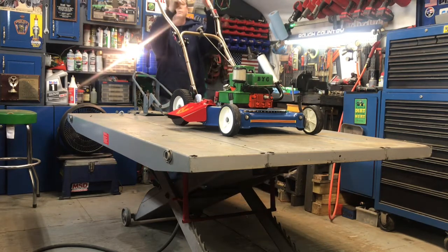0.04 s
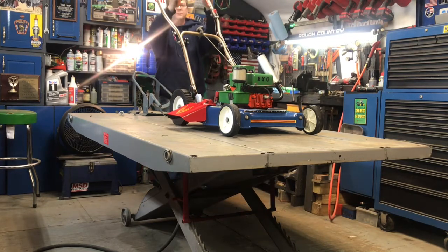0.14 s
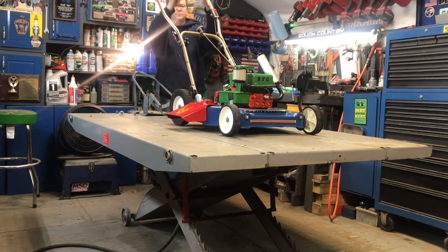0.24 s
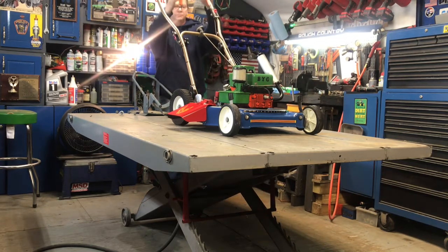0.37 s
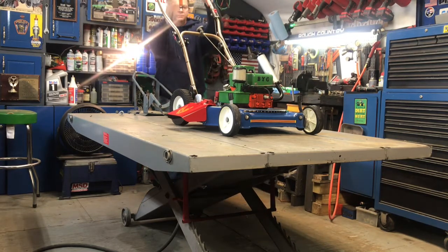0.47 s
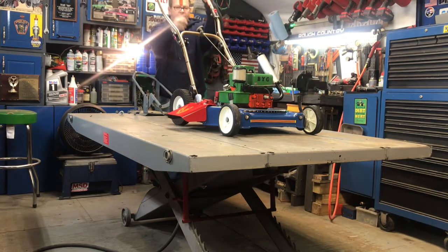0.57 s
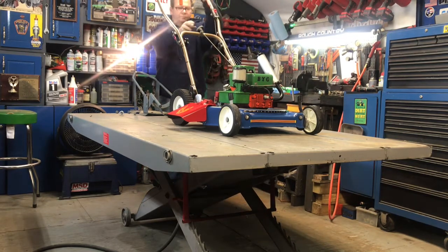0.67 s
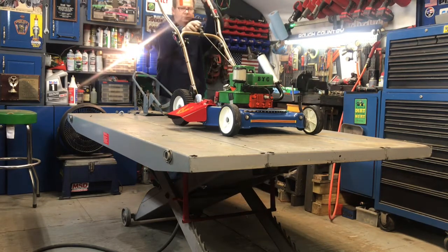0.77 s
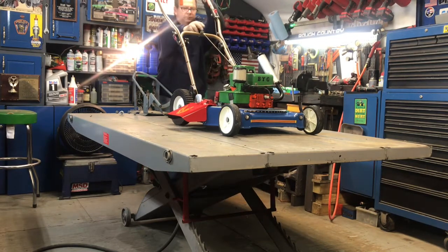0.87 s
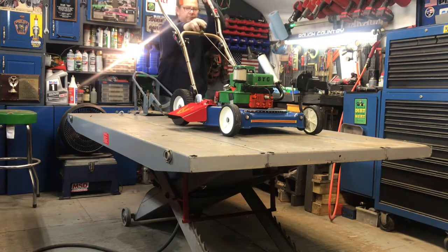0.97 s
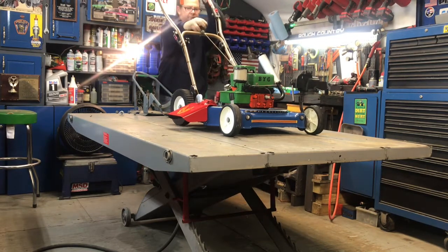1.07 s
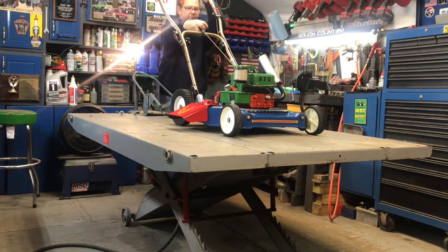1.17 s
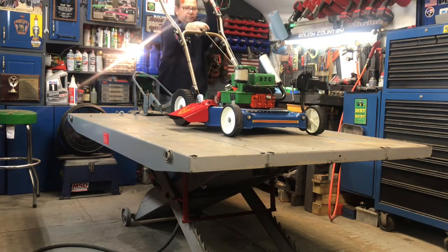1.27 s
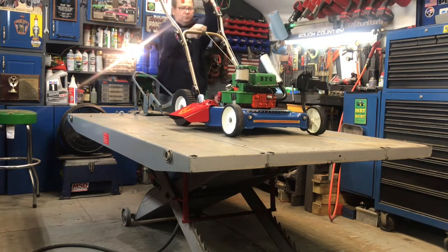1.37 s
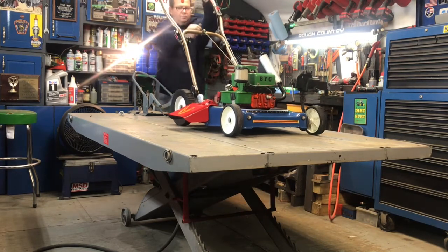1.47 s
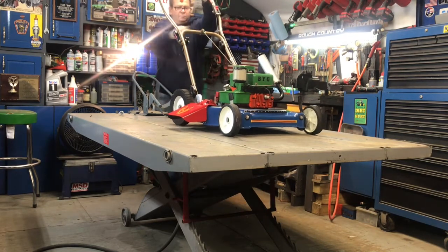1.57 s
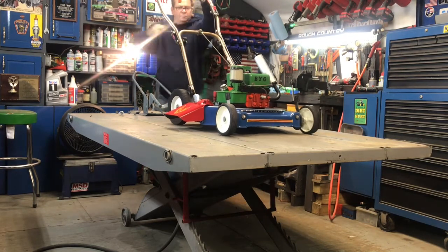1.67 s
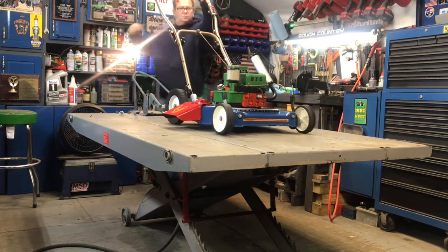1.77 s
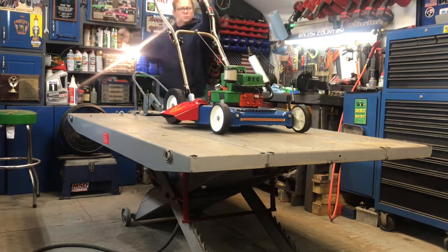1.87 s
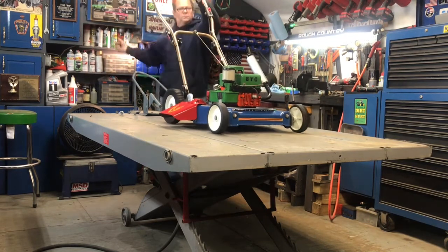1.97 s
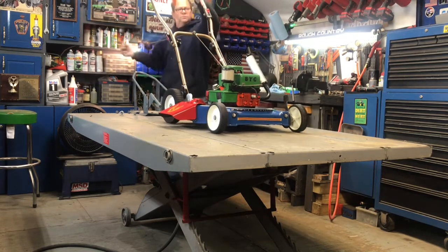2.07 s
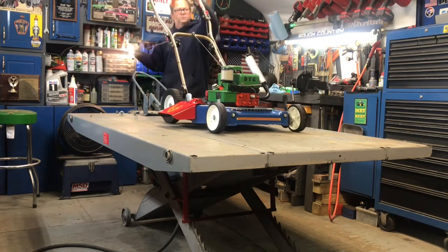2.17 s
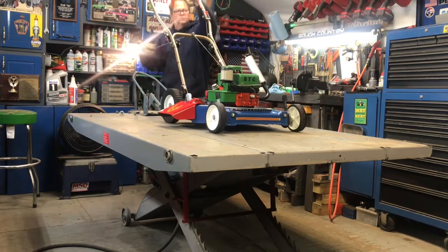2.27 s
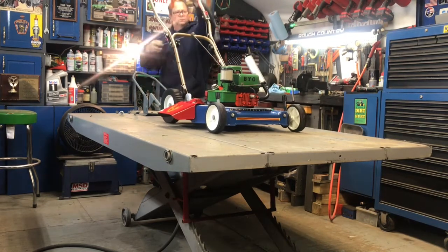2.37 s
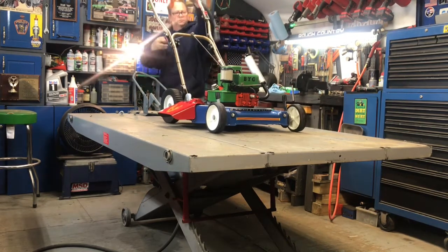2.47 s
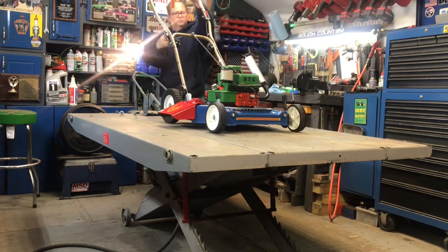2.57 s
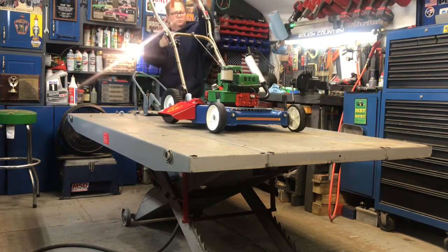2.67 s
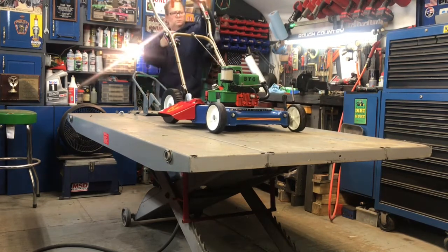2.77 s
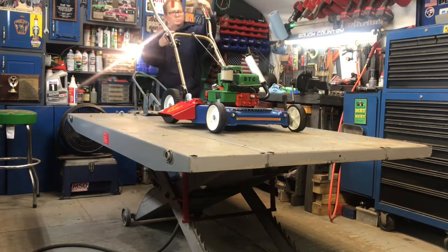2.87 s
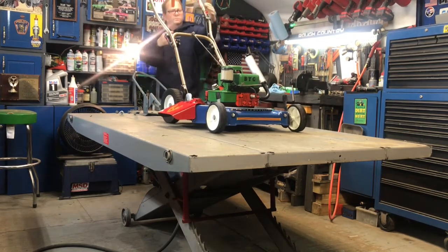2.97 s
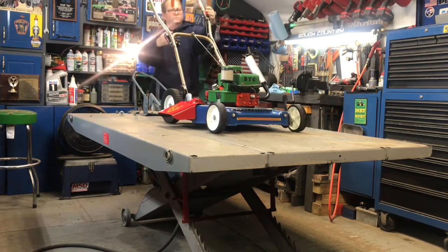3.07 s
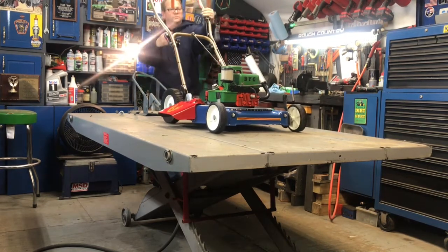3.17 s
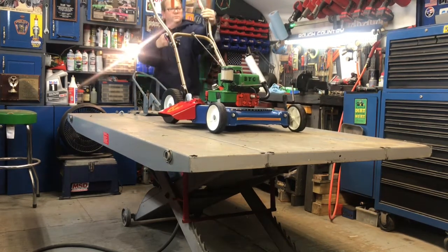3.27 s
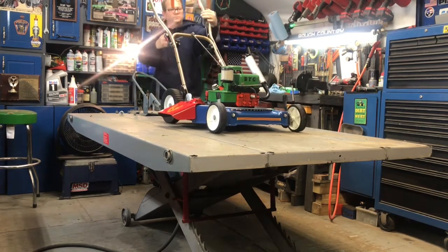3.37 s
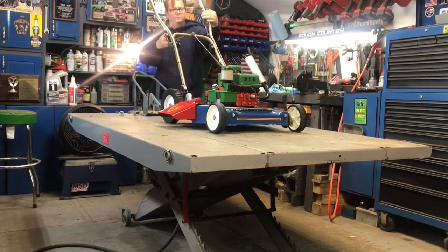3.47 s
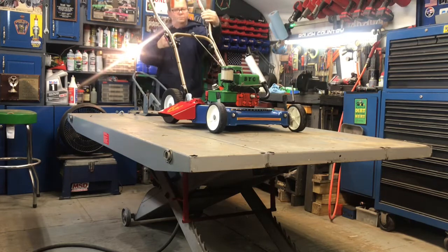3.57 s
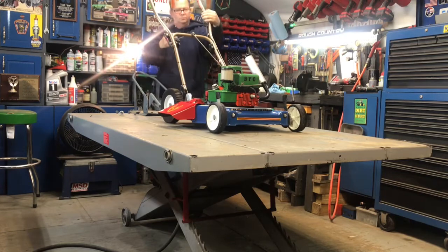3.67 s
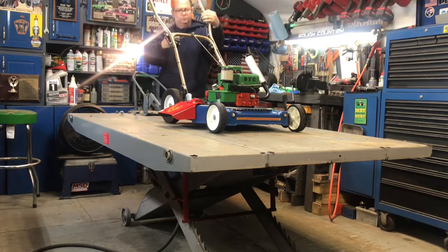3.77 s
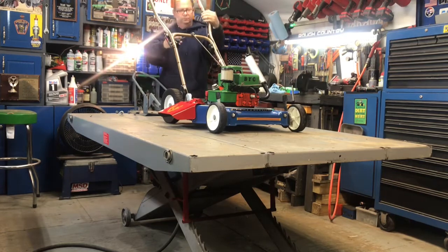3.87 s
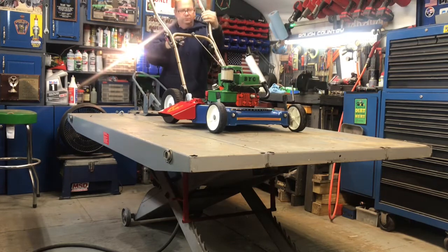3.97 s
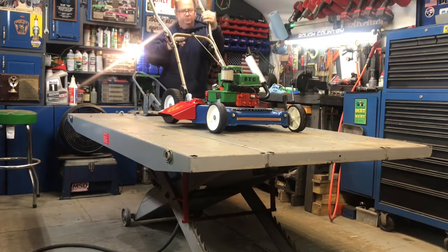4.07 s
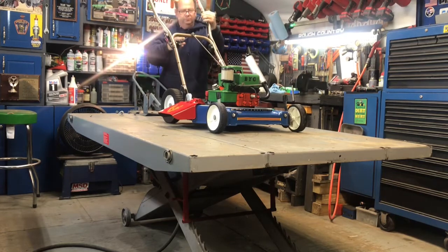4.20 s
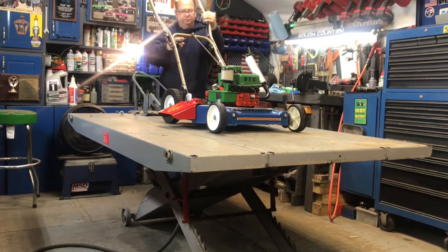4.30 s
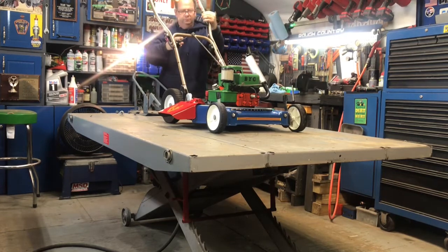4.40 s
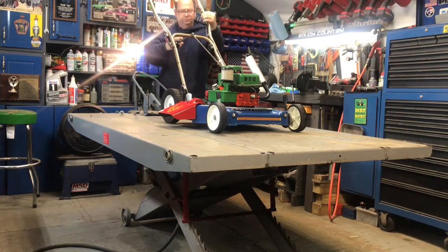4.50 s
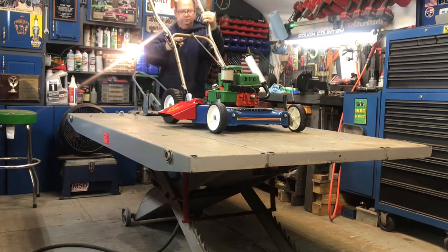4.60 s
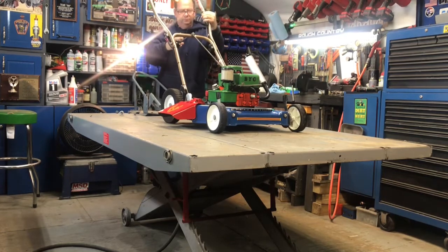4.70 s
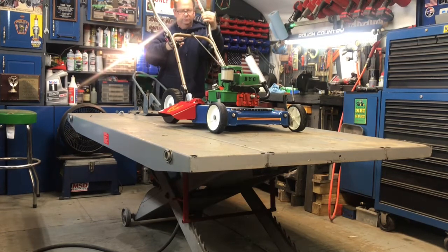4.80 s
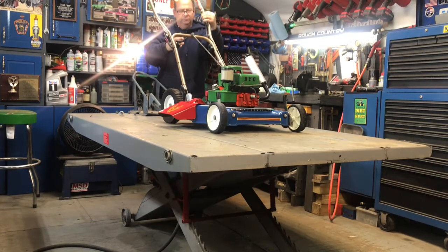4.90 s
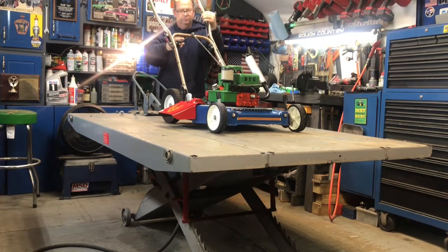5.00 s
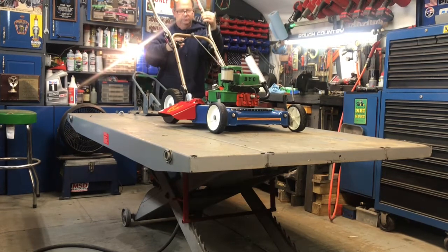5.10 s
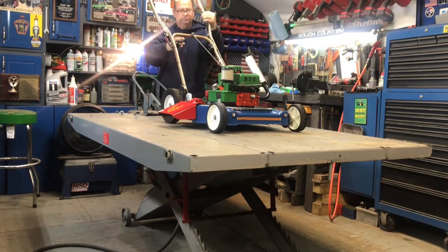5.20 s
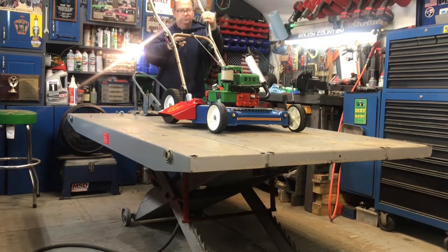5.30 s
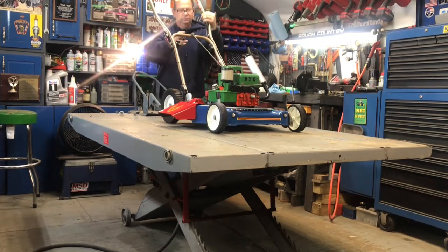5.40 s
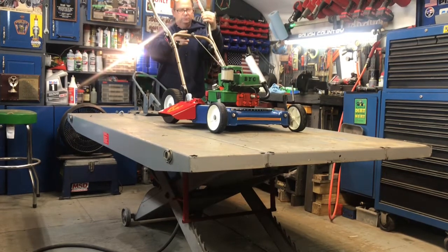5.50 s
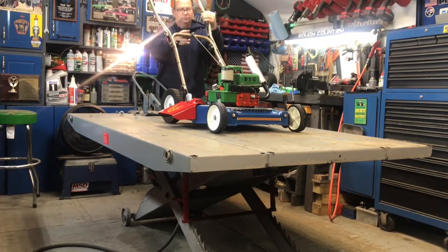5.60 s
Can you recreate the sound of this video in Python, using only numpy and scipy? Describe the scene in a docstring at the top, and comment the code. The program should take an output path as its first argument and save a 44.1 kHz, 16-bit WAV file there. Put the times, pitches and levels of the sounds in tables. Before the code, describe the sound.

Light handle clicks over a low blower rumble, then a rope-pulled lawn mower engine catches, idles in uneven chugs and revs up in a garage.

```python
"""A single-cylinder four-stroke mower is rope-started, catches, idles at six firings a second, then picks up.
Each cycle is a round of blows (exhaust, valve clack, compression knock): impulses and noise bursts placed by
crank phase, that ring the engine, deck and bench through filters. Before the pull the handle clicks, from
struck-tube contacts. Behind it all a furnace blower rumbles: shaped noise and a motor hum."""
import sys
import numpy as np
from scipy import signal
from scipy.fft import rfft, irfft
from scipy.io import wavfile
from scipy.ndimage import uniform_filter1d

SR = 44100
rng = np.random.default_rng(int(sys.argv[2]) if len(sys.argv) > 2 else 0)


def wav_out(sig):
    """Save sig, one row per channel (or a flat mono array), as 16-bit PCM at SR to the path in sys.argv[1]."""
    wavfile.write(sys.argv[1], SR, np.round(np.clip(np.atleast_2d(sig).T, -1, 1) * 32767).astype(np.int16))


N = 249165
TIME = np.arange(N) / SR

# engine speed, one cycle being two crank turns: (time [s], speed [cycles/s])
SPEED = [(1.4, 3.335), (1.63, 5.24), (1.95, 7.371), (2.74, 6.638), (2.8, 6.381), (3.49, 6.064),
         (4.36, 6.724), (4.85, 9.73), (5.6, 12.254)]
# throttle: (time [s], opening [0-1])
THROTTLE = [(1.8, 0.37), (1.95, 0.38), (2.37, 0.3), (2.55, 0.1), (3.4, 0.21), (4.39, 0.16), (4.52, 0.66),
            (5.3, 0.9)]
CRANK_S = 1.396  # first opening of the exhaust valve, as the rope turns the crank
IDLE_CYCLES_PER_S = 6.14

# strength of each part, before any offset its function adds: (base level [dB], rise at full throttle [dB],
# slope up to idle speed [dB/doubling], knee [cycles/s], slope above knee [dB/doubling])
THUMP_LAW = (-33, 4, 17, 15, 0)
BOOM_LAW = (-39, -4, 16, 4, -2.5)
SPIT_LAW = (-34.5, 12.5, -4.5, 10.5, -13)
CLACK_LAW = (-22.5, 0.8, 17, 8, -4.5)
KNOCK_LAW = (-26.5, -6, 9, 4.5, -1.5)
HUM_LAW = (-37, 2.5, 43, 8, -12)
CLATTER_LAW = (-31, -3, 16, 7.5, 6)

# cycles that fire harder or weaker than the throttle asks, or only pump air:
# (time [s], thump offset [dB], spit offset [dB])
ODD_CYCLES = [(1.396, 3, -14.5), (1.63, 3, -6.5), (1.802, 1, -0.5), (1.948, 4, -0.5), (2.084, 0.5, -0.5),
              (2.222, -3, -22), (2.809, 2, 2), (3.451, 0.5, 0.5), (3.934, 1.5, 1), (4.088, 0.5, 3.5),
              (4.241, -0.5, 3.5), (4.39, 0, 1.5), (5.159, -0.5, 0.5), (5.511, 0, 1)]
# hard firings, as the engine catches and as it picks up: (time [s], bark level [dB], ring level [dB])
HARD_FIRINGS = [(1.803, -22.5, -38), (4.503, -25, -35.5), (4.627, -27, -31), (4.653, -23.5, -26.5),
                (4.757, -25, -40), (4.86, -26.5, -38), (4.952, -23, -34), (5.052, -23, -29),
                (5.146, -22, -34), (5.238, -20, -25), (5.328, -18, -23), (5.414, -18, -23.5),
                (5.5, -19, -25), (5.588, -21, -32)]
# idle exhaust strokes that whistle: (time [s], length [s], starting pitch [Hz], level [dB])
WHISTLES = [(2.802, 0.12, 1730, -35), (2.943, 0.14, 1745, -32), (3.115, 0.17, 1700, -35),
            (3.259, 0.18, 1675, -35.5), (3.588, 0.11, 1740, -35), (3.736, 0.15, 1720, -36.5),
            (3.905, .12, 1730, -35.5)]
# how hard the mower rocks on the bench, before the push offset: (time [s], level [dB])
ROCKING = [(1.6, -45), (1.9, -36), (2.04, -34.5), (2.18, -36), (2.33, -36.5), (2.47, -36.5), (2.8, -41),
           (3.5, -54), (4.25, -38), (5, -58)]
# rattle over one cycle, loud where the crank is jerked, lulled while it coasts: (share of cycle, level [dB])
RATTLE = [(.05, -2.5), (.24, -0.5), (.34, 1), (.54, -.5), (.67, 0), (.79, -0.5), (.94, -4)]
# jolts on the bench under the pull of the rope: (time [s], level [dB])
JOLTS = [(1.455, -27), (1.571, -27.5), (1.687, -30)]
# handle and bail contacts, levels before offsets: (time [s], thunk [dB], knock [dB], snap [dB], tick [dB],
# favoured resonance [Hz], its ring level [dB])
CONTACTS = [(0.056, -57, -53, -44, -60, 1772, -45), (.062, -34, -46, -55, -70, 306, -38.5),
            (.12, -61, -67, -45.5, -64, 4160, -54), (0.129, -51, -59, -61, -63, 2700, -58),
            (.261, -52, -52.5, -80, -92, 985, -58), (0.304, -53, -59, -77, -75, 829, -59),
            (0.976, -60, -53, -66, -72, 471, -45), (0.991, -54, -44.5, -58, -70, 985, -51),
            (1.1, -62, -64, -70, -52, 1235, -66), (1.14, -60, -56, -80, -75, 985, -57),
            (1.204, -50, -47.5, -74, -75, 910, -40.5)]

# resonances of engine and deck, handle, cylinder head, bench:
# (frequency [Hz], width [Hz], level over the broad response [dB])
DECK_MODES = [(306, 39, -3.5), (550.5, 11, 5.5), (758, 32, 1), (913, 24, 3.5), (983, 20, 5.5),
              (1162, 22, 1), (1309, 11.6, 5), (1330, 12, -18), (1516, 33, 2.5), (1685, 23, -5),
              (1762, 25, 0.5), (2237, 40, -1), (2597, 25, 5.5), (2648, 25, 3.5), (2800, 19, -1),
              (3340, 9.8, -9), (3502, 17, 7.5)]
HANDLE_MODES = [(310, 60, 5), (466, 18, 9), (553, 14, 0), (830, 18, 4), (913, 13, -2), (985, 11, -1),
                (1243, 23, 10), (1640, 20, 1), (1790, 50, -1), (2060, 42, 0), (2740, 50, -2), (3480, 55, 1),
                (3830, 76, 1), (4160, 60, 5)]
HEAD_MODES = [(1602, 120, 7.5), (1764, 70, -2.5), (2084, 120, -5), (2405, 99, 8)]
BENCH_MODES = [(75, 14, -9), (136, 28, -10)]

# broad spectral shape of each sound: (frequency [Hz], relative level [dB])
# exhaust: slug, hollow muffler and crankcase, gas spit, combustion ping
THUMP_SHAPE = [(22, -34), (42, 5), (60, 0.5), (85, 4), (150, -2.5), (210, -14), (310, -25), (420, -19.5),
               (560, -17), (800, -43), (2000, -60)]
BOOM_SHAPE = [(48, -4), (85, -3), (150, 1.5), (215, -13.5), (300, -27), (800, -48)]
SPIT_SHAPE = [(300, 15), (1000, 12.5), (2500, 2), (4500, 11), (6500, 13), (7500, 8), (8700, 15),
              (10300, 6.5), (12000, 11.5), (15500, 9)]
PING_SHAPE = [(450, -4), (750, -11), (1200, -16), (1600, -2.5), (2050, 0.5), (2450, -5), (2900, -13),
              (5000, -17), (10000, -34)]
# mechanics: valve clack, compression knock, rattle, rope
CLACK_SHAPE = [(90, -17), (170, -3), (240, -12), (320, -13), (450, -4.5), (700, -4.5), (1200, 2),
               (1700, 0.5), (2100, 4), (3200, 8.5), (4300, 5.5), (5000, 0), (6200, -0.5), (8000, -8),
               (15000, -23)]
KNOCK_SHAPE = [(80, -9), (160, 4), (240, -8), (320, -1), (420, -4.5), (650, -4), (1000, 0.5), (1600, 1.5),
               (2200, -26), (4000, -4.5), (6000, -6.5), (9000, -12.5), (10500, -15), (15000, -20)]
METAL_SHAPE = [(60, -30), (150, -7), (250, -14), (400, -9), (660, -15), (800, -8.5), (950, -1.5),
               (1600, -1.5), (2100, -5), (4200, -5.5), (4800, -11), (6000, -9.5), (7500, -20), (8700, -15),
               (10200, -22.5), (12000, -17), (15500, -24.5)]
ROPE_SHAPE = [(100, -19), (300, -1.5), (700, -4.5), (1100, -0.5), (2500, 0), (4300, 0.5), (5200, -4),
              (9000, -7), (10500, -11.5), (15000, -13.5)]
# handle contacts, soft to hard
THUNK_SHAPE = [(100, -21), (230, -9), (320, 2.5), (500, -5.5), (900, -5.5), (2000, -41)]
RAP_SHAPE = [(250, -20), (500, -3), (950, 4), (1800, -7), (3000, -10), (8000, -57)]
SNAP_SHAPE = [(700, -38), (1900, 4.5), (2600, -3), (3500, 5), (4500, -1), (5400, -7), (9000, -15),
              (15000, -34)]
TICK_SHAPE = [(2000, -23), (6000, 2), (10000, 4), (15000, 3)]
# furnace: low rumble, air hiss
RUMBLE_SHAPE = [(20, -23), (32, -26), (45, -8), (60, -9), (72, 6), (85, -10.5), (105, -11.5), (130, -21),
                (250, -41)]
AIR_SHAPE = [(65, -54), (110, -11), (154, -5.5), (193, -33), (233, -12.5), (275, -19), (483, -21),
             (780, -26), (848, -21.5), (1210, -30.5), (1520, -28), (1650, -33), (2600, -39), (5200, -41),
             (10500, -35), (12700, -27), (16000, -40)]


def amp(db):
    """Decibels to gain."""
    return 10 ** (np.asarray(db) / 20)


def unit(x):
    """Scale to rms 1."""
    return x / np.sqrt(np.mean(x ** 2))


def noise():
    """White noise, full length."""
    return rng.standard_normal(N)


def wander(size):
    """Slow random curve of rms 1: noise averaged over this many samples."""
    return unit(uniform_filter1d(noise(), size=size))


def convolve(x, response):
    """Pass a sound through an impulse response."""
    return signal.fftconvolve(x, response)[:N]


def colour(points, modes=(), size=16384):
    """Causal impulse response of unit energy: a broad (Hz, dB) shape with resonances standing on it."""
    hz = np.maximum(np.arange(size // 2 + 1) * SR / size, 1)
    at_hz, db = np.transpose(points)
    gain = amp(np.interp(np.log(hz), np.log(at_hz), db))
    gain = gain * np.minimum(hz / at_hz[0], 1) * np.minimum(at_hz[-1] / hz, 1)
    gain = gain * (1 + sum(amp(d) / (1 + (2 * (hz - f) / w) ** 2) for f, w, d in modes))
    # minimum phase: fold the cepstrum onto positive time
    cepstrum = irfft(np.log(gain))
    cepstrum[1:size // 2] *= 2
    cepstrum[size // 2 + 1:] = 0
    response = irfft(np.exp(rfft(cepstrum)))
    return response / np.linalg.norm(response)


def impulses(times, sizes):
    """One impulse of the given size at each time."""
    index = (np.asarray(times) * SR).astype(int)
    return np.bincount(np.maximum(index, 0), sizes, N)[:N]


def blows(times, db, rise_s, fall_s, loose, tail_db, tail_s=0.058, grit=0.51):
    """Rattling bursts with a room tail; one part repeats at every blow, the loose share (0-1) is new each time."""
    t = TIME[:SR // 3]
    shape = (1 - np.exp(-t / rise_s)) * (np.exp(-t / fall_s) + amp(tail_db) * np.exp(-t / tail_s))
    hits = impulses(times, amp(db))
    grain = rng.standard_normal(len(t)) * np.exp(grit * rng.standard_normal(len(t)))
    same = convolve(hits, shape * unit(grain))
    fresh = np.sqrt(np.abs(convolve(hits ** 2, shape ** 2))) * noise()
    return np.sqrt(1 - loose) * same + np.sqrt(loose) * fresh


def speed(times):
    """Engine cycles per second at these times."""
    return np.interp(times, *np.transpose(SPEED))


def cycles_run():
    """Engine cycles completed at every sample, counted from the first opening of the exhaust valve."""
    run = np.cumsum(speed(TIME)) / SR
    return run - np.interp(CRANK_S, TIME, run)


def at_phase(phase):
    """The moment in every cycle when the crank has run this share of its two turns."""
    run = cycles_run()
    return np.interp(np.arange(int(run[-1]) + 1) + phase, run, TIME, right=2 * TIME[-1])


def strength(times, law):
    """Level [dB] of a part: follows the throttle and, with separate slopes up to idle and above a knee, speed."""
    base_db, throttle_db, slow_db, knee, fast_db = law
    slow = np.minimum(np.log2(speed(times) / IDLE_CYCLES_PER_S), 0)
    fast = np.maximum(np.log2(speed(times) / knee), 0)
    throttle = np.interp(times, *np.transpose(THROTTLE))
    return base_db + throttle_db * throttle + slow_db * slow + fast_db * fast


def cycle_offsets(opens):
    """The dB that each cycle gains or loses in its thump and in its spit; 0 where none is listed."""
    times, *offsets = np.transpose(ODD_CYCLES)
    cycle = [np.argmin(abs(opens - s)) for s in times]
    return [np.bincount(cycle, db, len(opens)) for db in offsets]


def exhaust(slug_phase=0.0204, delay_s=0.00765, echo_s=0.0127, echo=0.55, slug_db=30, scatter_db=1.5):
    """The valve opens with a spit of gas; the slug thumps, returns off the wall and booms the muffler."""
    opens, leaves = at_phase(0), at_phase(slug_phase) + delay_s
    uneven_db = scatter_db * rng.standard_normal(len(opens))
    odd_thump_db, odd_spit_db = cycle_offsets(opens)
    charge_db = odd_thump_db + uneven_db
    slug = amp(strength(opens, THUMP_LAW) + charge_db + slug_db)
    slugs = impulses(leaves, slug) + echo * impulses(leaves + echo_s, slug)
    boom_db = strength(opens, BOOM_LAW) + charge_db
    boom = blows(leaves, boom_db, rise_s=0.003, fall_s=0.022, loose=0.15, tail_db=-21)
    spit_db = strength(opens, SPIT_LAW) + odd_spit_db + uneven_db
    spit = blows(opens - .0025, spit_db, rise_s=0.0018, fall_s=0.034, loose=0.39, tail_db=-39)
    thump = -convolve(slugs, colour(THUMP_SHAPE))
    return convolve(boom, colour(BOOM_SHAPE)) + thump + convolve(spit, colour(SPIT_SHAPE))


def pings(echo_s=.0115, echo=0.33, peak_s=0.0066, sharp=0.053, sag_per_s=5.74):
    """Hard firings bark and ring the head, sharp at first, sagging as the gas cools, echoed off the wall."""
    times, bark_db, ring_db = np.transpose(HARD_FIRINGS)
    bark = blows(times, bark_db, rise_s=0.0031, fall_s=0.011, loose=0.58, tail_db=-19)
    out = convolve(bark, colour(PING_SHAPE, HEAD_MODES))
    t = TIME[:SR // 20]
    swell = t / peak_s * np.exp(1 - t / peak_s)
    hz, _, mode_db = np.transpose(HEAD_MODES)
    mode_gain = amp(mode_db - mode_db.max())
    for s, db, angles in zip(times, ring_db, rng.random((len(times), len(hz)))):
        turns = np.outer(hz, t * (1 + sharp - sag_per_s * t / 2)) + angles[:, None]
        ring = mode_gain @ np.sin(2 * np.pi * turns) * swell
        start = int(s * SR)
        out[start:start + len(t)] += amp(db) * ring[:N - start]
    return convolve(out, impulses([0, echo_s], [1, echo]))


def whistle(sag_hz_per_s=560, flutter_db=2.0, wander_hz=5):
    """At idle gas whistles thinly through the muffler; the pitch sags as each exhaust stroke runs out."""
    drift, flutter = wander(700), wander(700)
    out = 0
    for s, length_s, start_hz, db in WHISTLES:
        t = np.clip(TIME - s, 0, length_s)
        swell = np.abs(np.sin(np.pi * t / length_s))
        hz = start_hz - sag_hz_per_s * t + wander_hz * drift
        out = out + amp(db) * swell * np.sin(2 * np.pi * np.cumsum(hz) / SR)
    return out * amp(flutter_db * flutter)


def valve_gear(clack_phase=.305, knock_phase=.71):
    """A clack as the exhaust valve shuts and the intake opens; a knock near the top of compression."""
    phase_scatter, level_scatter = rng.standard_normal((len(at_phase(0)), 2)).T
    shuts, tops = at_phase(clack_phase + .004 * phase_scatter), at_phase(knock_phase)
    clack_db = strength(shuts, CLACK_LAW)
    clack = blows(shuts, clack_db, rise_s=0.005, fall_s=0.019, loose=0.8, tail_db=-25.0)
    knock_db = strength(tops, KNOCK_LAW) + 1.45 * level_scatter
    knock = blows(tops, knock_db, rise_s=0.0032, fall_s=0.022, loose=0.31, tail_db=-11)
    return convolve(clack, colour(CLACK_SHAPE, DECK_MODES)) + convolve(knock, colour(KNOCK_SHAPE, DECK_MODES))


def thuds(phase=.738, push_db=30.5, scatter_db=1, echo_s=0.014, echo=0.67):
    """Each compression stroke rocks the mower against the hollow bench, and the wall returns the thud."""
    times = at_phase(phase)
    rocking_db = np.interp(times, *np.transpose(ROCKING)) + scatter_db * rng.standard_normal(len(times))
    push = amp(rocking_db + push_db)
    pushes = impulses(times, push) + echo * impulses(times + echo_s, push)
    return convolve(pushes, colour(BOOM_SHAPE, BENCH_MODES))


def deck_hum(hum_hz=322, swell_cycles=0.061, phase=.285, lag_s=.008, detune=0.02):
    """A low deck resonance swells and dies once on every crank turn, slightly detuned each time."""
    peaks = np.concatenate([at_phase(phase), at_phase(phase + .5)]) + lag_s
    chance = rng.standard_normal((len(peaks), 2))
    t = TIME[:SR // 5] - TIME[SR // 10]
    out = np.zeros(N + len(t))
    for s, db, (pitch, angle) in zip(peaks, strength(peaks, HUM_LAW), chance):
        if s < TIME[-1]:
            start = int((s + t[0]) * SR)
            tone = np.sin(2 * np.pi * (hum_hz * (1 + detune * pitch) * t + angle))
            swell = np.exp(-(t * speed(s) / swell_cycles) ** 2 / 2)
            out[start:start + len(t)] += amp(db) * swell * tone
    return out[:N]


def clatter(count=12, rush_db=-4):
    """Gears, linkage and deck tap near the same crank angles every cycle over blade rush; rope jolts added."""
    taps = 0
    for k in range(count):
        phase_scatter, level_scatter = rng.standard_normal((len(at_phase(0)), 2)).T
        times = at_phase((k + .5) / count + .004 * phase_scatter)
        taps = taps + blows(times, 2.6 * level_scatter, rise_s=0.00012, fall_s=0.0043, loose=0.28, tail_db=1.0)
    turning = np.clip((TIME - CRANK_S) / 0.018, 0, 1)
    rush = amp(rush_db) * turning * noise()
    db = strength(TIME, CLATTER_LAW) + np.interp(cycles_run(), *np.transpose(RATTLE), period=1)
    jolts = blows(*np.transpose(JOLTS), rise_s=0.0015, fall_s=0.021, loose=0.85, tail_db=-24)
    return convolve((unit(taps) + rush) * amp(db) + jolts, colour(METAL_SHAPE, DECK_MODES))


def starter(grab_s=1.401, home_s=2.22, attack_s=0.009, slack_db=-45.5, loaded_db=-35,
            rise_db_per_s=117, fall_db_per_s=130):
    """The rope rasps through its guide, soft while slack, loud under load, till the recoil spool has it back."""
    rasp = noise() * amp(2.7 * wander(200))
    db = np.interp(TIME, [grab_s, grab_s + attack_s], [slack_db, loaded_db])
    db = db - rise_db_per_s * np.maximum(grab_s - TIME, 0)
    db = db - fall_db_per_s * np.maximum(TIME - home_s, 0)
    return unit(convolve(rasp, colour(ROPE_SHAPE, DECK_MODES))) * amp(db)


def cabinets(x, echoes_s=(.0019, .0031, .0047, .0068), gain=.15, low_hz=3800):
    """Bench top and steel cabinets throw the treble back early, which gives a tinny colour."""
    treble = signal.sosfilt(signal.butter(2, low_hz, "high", fs=SR, output="sos"), x)
    return x + convolve(treble, impulses(echoes_s, np.full(len(echoes_s), gain)))


def handle(strike_db=20.5, rattle_db=-8, ring_s=0.027):
    """Hands take up handle and bail: soft contacts thunk, hard ones snap, each leaves one tube mode ringing."""
    times, *levels, favoured_hz, ring_db = np.transpose(CONTACTS)
    out = 0
    for db, shape in zip(levels, [THUNK_SHAPE, RAP_SHAPE, SNAP_SHAPE, TICK_SHAPE]):
        strikes = impulses(times, amp(db + strike_db))
        rattle = blows(times, db + rattle_db, rise_s=0.001, fall_s=0.027, loose=0.57, tail_db=1.0, tail_s=0.051)
        out = out + convolve(strikes + rattle, colour(shape, HANDLE_MODES))
    modes_hz = np.transpose(HANDLE_MODES)[0]
    for s, hz, db in zip(times, favoured_hz, ring_db):
        t = np.maximum(TIME - s, 0)
        mode_hz = modes_hz[np.argmin(abs(modes_hz - hz))]
        out = out + amp(db) * np.exp(-t / ring_s) * np.sin(2 * np.pi * mode_hz * t)
    return out


def furnace(rumble_db=-42.5, air_db=-53.5, hum_hz=151, hum_db=-58, fade_s=(1.4, 1.8), fade_db=-1.0):
    """Blower: low rumble, air hiss and faint motor hum; all recede slightly as the engine starts."""
    rumble = unit(convolve(noise(), colour(RUMBLE_SHAPE)))
    rumble = rumble / np.sqrt(uniform_filter1d(rumble ** 2, size=8000))  # evens out slow swells
    air = unit(convolve(noise(), colour(AIR_SHAPE)))
    hum = np.sin(2 * np.pi * hum_hz * TIME)
    blower = amp(rumble_db) * rumble + amp(air_db) * air + amp(hum_db) * hum
    return blower * amp(np.interp(TIME, fade_s, [0, fade_db]))


def scene():
    """Mower with cabinet echoes, handle and furnace, mixed to one channel."""
    engine = exhaust() + pings() + whistle() + valve_gear()
    body = thuds() + deck_hum() + clatter() + starter()
    return (cabinets(engine + body) + handle() + furnace())[None]


def record(dry, top_hz=15850):
    """The recorder cuts the top steeply: elliptic low-pass."""
    return signal.sosfilt(signal.ellip(12, .2, 80, top_hz, fs=SR, output="sos"), dry)


dry = scene()
out = record(dry)
wav_out(out)
```